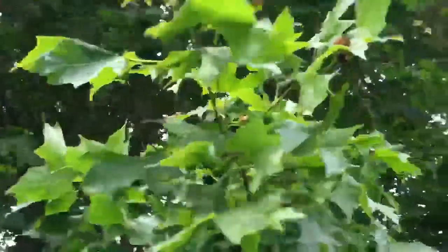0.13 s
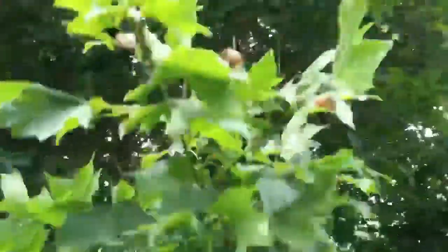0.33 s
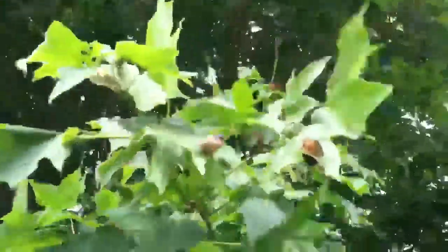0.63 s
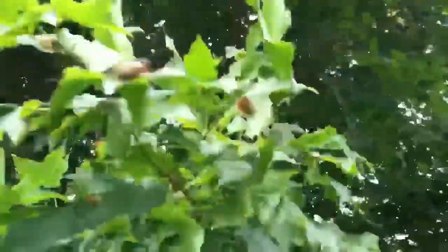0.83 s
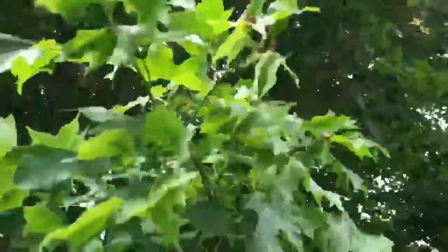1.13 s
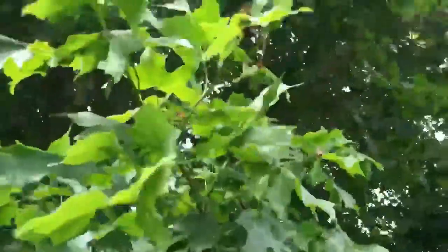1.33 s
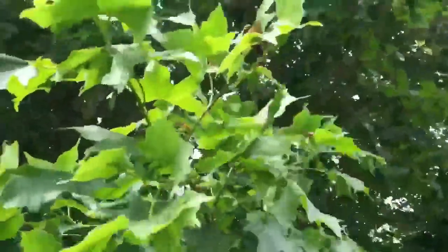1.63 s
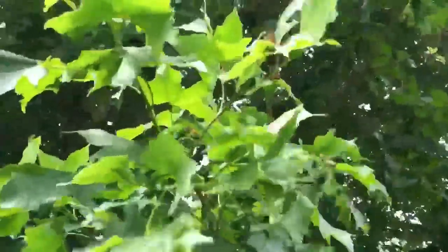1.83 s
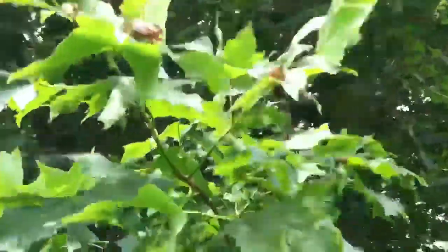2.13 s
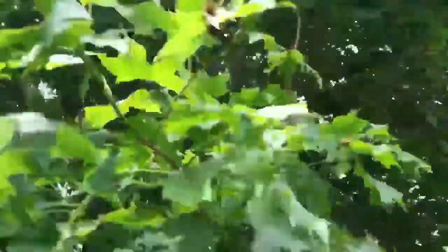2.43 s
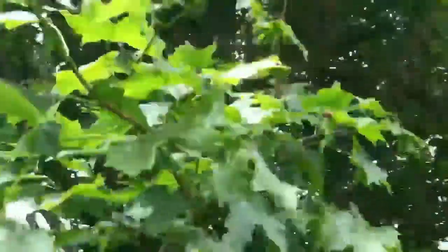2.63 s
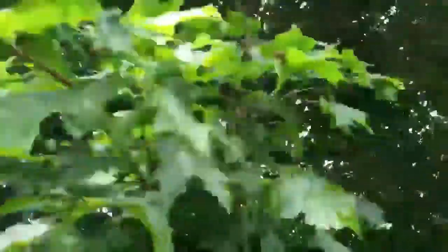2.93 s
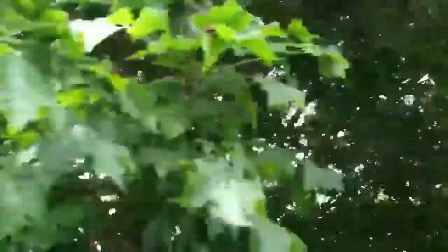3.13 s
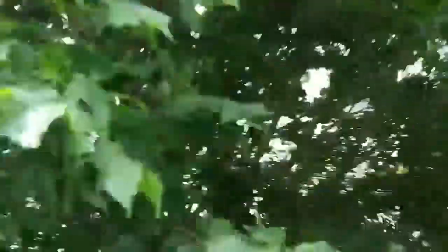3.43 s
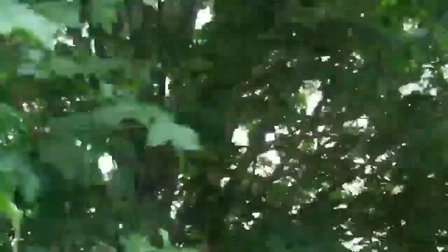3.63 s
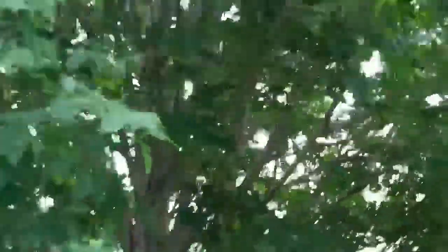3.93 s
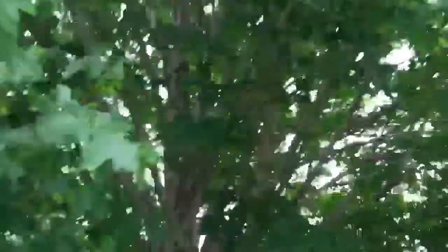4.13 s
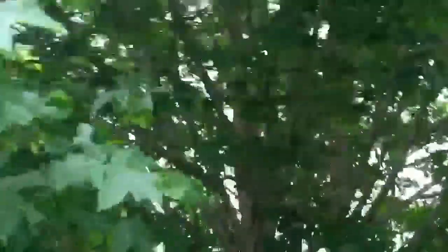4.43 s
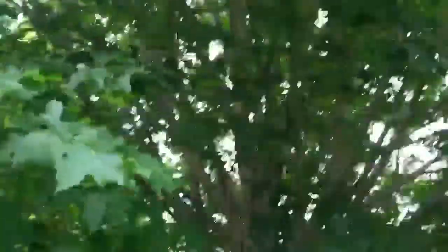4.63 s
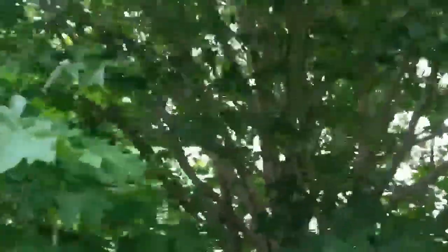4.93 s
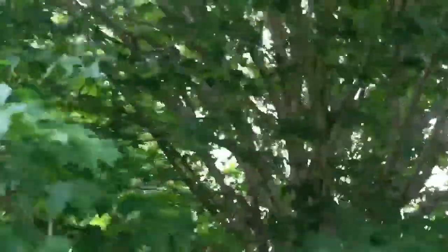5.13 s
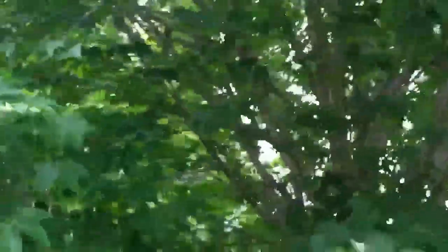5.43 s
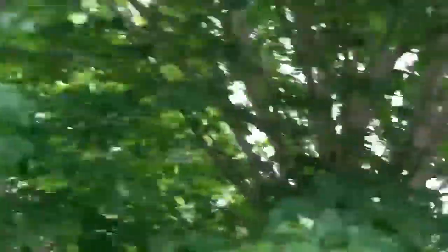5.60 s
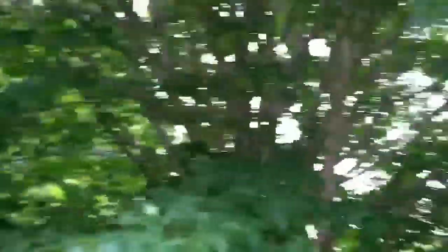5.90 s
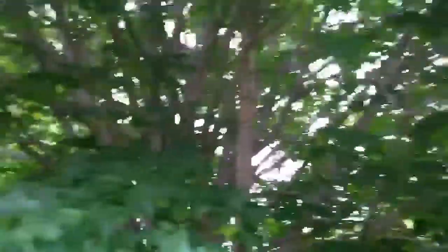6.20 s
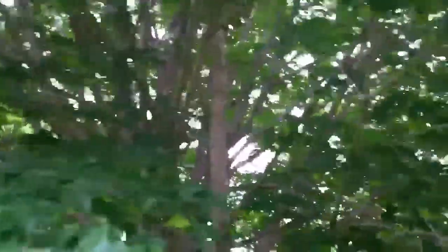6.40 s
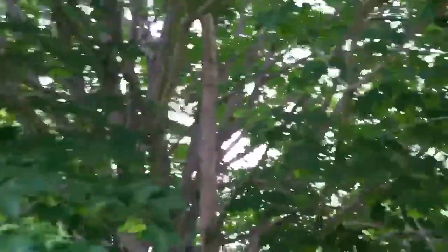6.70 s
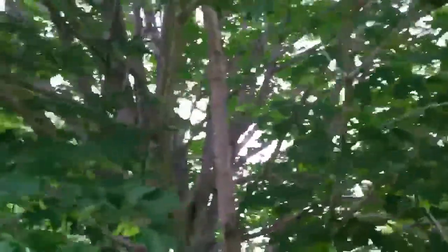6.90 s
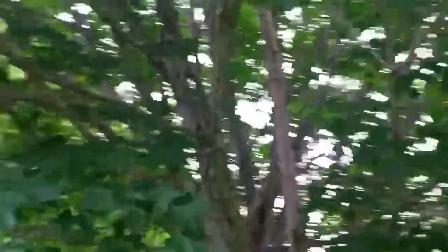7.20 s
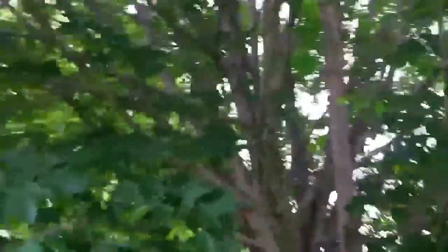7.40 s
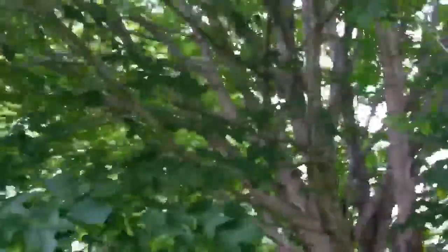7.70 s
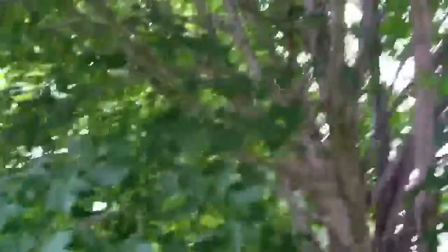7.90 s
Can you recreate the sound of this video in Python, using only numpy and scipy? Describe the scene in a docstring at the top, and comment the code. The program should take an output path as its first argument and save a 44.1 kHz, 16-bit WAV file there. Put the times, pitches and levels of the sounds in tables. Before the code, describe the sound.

Outdoors among trees, continuous shrill cicada song surges in slow waves, grainy and dense, never pausing. Breeze flutters and thuds against an unprotected microphone in the first half, strongest just before four seconds, and the second half is calmer. A distant motor hum and rough whirr become more noticeable later, over a soft wash of far road noise and a low insect drone. Left channel only, right silent.

```python
"""A swarm of periodical cicadas drones in the trees round a yard, swelling and sinking in waves.
Shaped noise is the far swarm; click trains ringing in body resonances are the near ones, crackling through it.
A second species, narrow-band noise, hums lower, far off; two distant machines and a fan add harmonics and tones.
A breeze, noise under gust and eddy envelopes, buffets the microphone, which feeds only the left channel."""
import sys
import numpy as np
from scipy import signal
from scipy.fft import rfft, irfft, next_fast_len
from scipy.io import wavfile
from scipy.ndimage import uniform_filter1d

SR = 44100
rng = np.random.default_rng(int(sys.argv[2]) if len(sys.argv) > 2 else 0)


def to_wav(sig):
    """Store sig (one row per channel, or 1-D mono) as 16-bit WAV at the path in sys.argv[1].

    Samples outside -1..1 are clipped; the rate is SR.
    """
    pcm = np.clip(np.atleast_2d(sig), -1, 1) * 32767
    pcm = np.round(pcm).astype(np.int16)
    wavfile.write(sys.argv[1], SR, pcm.T)  # frames by channels


N = 355049
TIME = np.arange(N) / SR
FREQ = np.fft.rfftfreq(N, 1 / SR)
# Source levels are set ahead of the input gain in scene().


def gain_of(db):
    """Decibels to amplitude."""
    return 10 ** (np.asarray(db) / 20)


def evened(x):
    """Scales to rms 1."""
    return x / np.sqrt(np.mean(x ** 2) + 1e-20)


def noise():
    """White noise."""
    return rng.standard_normal(N)


def wander(rate_hz):
    """Slow random drift of rms 1: straight lines between rate_hz random knots a second."""
    knots = rng.standard_normal(4096)
    return evened(np.interp(TIME * rate_hz, np.arange(len(knots)), knots))


def follow(rows):
    """Each column of a curve table, sample by sample."""
    t, *columns = np.transpose(rows)
    return [np.interp(TIME, t, column) for column in columns]


def bell(peak_s, length_s):
    """Gaussian envelope that peaks at peak_s and falls to 1/e in length_s."""
    return np.exp(-np.minimum(((TIME - peak_s) / length_s) ** 2, 60))


def waves(rows):
    """Height in dB of smooth swells that rise to a crest and sink back."""
    height_db = np.zeros(N)
    for crest_s, rise_s, fall_s, db in rows:
        side_s = np.where(TIME < crest_s, rise_s, fall_s)
        position = np.clip((TIME - crest_s) / side_s, -1, 1)
        height_db += db * np.cos(np.pi / 2 * position) ** 2
    return height_db


def filtered(x, gain):
    """Applies a gain given for every frequency in FREQ; rms 1."""
    size = next_fast_len(N, True)
    size_gain = np.interp(np.fft.rfftfreq(size, 1 / SR), FREQ, gain)
    return evened(irfft(rfft(x, size) * size_gain, size)[:N])


def coloured(x, points):
    """Weights the spectrum of x by (Hz, dB) points, joined on a log-frequency axis; rms 1."""
    hz, db = np.transpose(points)
    return filtered(x, gain_of(np.interp(np.log(FREQ + 1), np.log(hz + 1), db)))


def resonance(hz, width_hz):
    """Gain of a resonance of unit power, 6 dB down at width_hz / 2 either side."""
    return evened(1 / (1 + ((FREQ - hz) / width_hz * 2) ** 2))


def turning(hz, drift, rate_hz):
    """Phase in radians of a rotation at hz whose speed drifts by the fraction drift (rms)."""
    return 2 * np.pi * np.cumsum(hz * (1 + drift * wander(rate_hz))) / SR


def harmonics(phase, rows, waver_db, smear_rad, smear_rate_hz=7):
    """Harmonics of a turning machine; each fades and smears on its own way through the trees."""
    total = np.zeros(N)
    for multiple, db in rows:
        start = 2 * np.pi * rng.random()
        angle = round(multiple) * phase + smear_rad * wander(smear_rate_hz) + start
        total += gain_of(db + waver_db * wander(6)) * np.sin(angle)
    return evened(total)


def tymbals(count=12, click_rate_hz=330, jitter=.12, size_db=1.5, swell_db=1.7):
    """Near cicadas: each buckles its ribs in a fast uneven train that swells and fades."""
    clicks = np.zeros(N)
    for _ in range(count):
        rate_hz = click_rate_hz * rng.uniform(.7, 1.3) * (1 + jitter * wander(60))
        at = np.flatnonzero(np.diff(np.floor(np.cumsum(rate_hz) / SR)))
        swell = swell_db * wander(1.62)[at]
        size = size_db * np.clip(noise()[at], -2.5, 2.5)
        clicks[at] += gain_of(swell + size)
    return evened(clicks)


def callers(count=5, low_hz=4800, high_hz=6900, width_hz=3800):
    """Small groups of near cicadas, each with its own body pitch."""
    groups = [filtered(tymbals(count=2), resonance(hz, width_hz))
              for hz in np.linspace(low_hz, high_hz, count)]
    return evened(sum(groups))


# body colour of the massed tymbals: f/Hz, relative level/dB
BUZZ = [(1900, -40), (2700, -32.5), (3200, -22.5), (3700, -12), (4200, -7.5), (5150, -7), (5550, -2),
        (6050, -0.5), (6550, -3.5), (7450, -13), (8400, -14.5), (10000, -24.4), (12400, -33), (13300, -69)]
# waves of song: crest t/s, rise/s, fall/s, height above lull/dB
WAVES = [(3.0, 2.7, 1.4, 4), (4.15, 1.1, 1.37, 3.5), (7.9, 2.23, 1.95, 3.5)]


def chorus(lull_db=-26, near_db=-9, flutter_db=0.4, shrill_hz=6400, shrill_db_per_db=0.15):
    """Near clicks and the blur of the far swarm ring in the same body; louder waves are shriller."""
    wave_db = waves(WAVES)
    song = coloured(noise() + gain_of(near_db) * callers(), BUZZ)
    high_pass = signal.butter(3, shrill_hz, "high", fs=SR, output="sos")
    treble = signal.sosfiltfilt(high_pass, song)
    shrill_db = shrill_db_per_db * (wave_db - wave_db.mean())
    song = song + treble * (gain_of(shrill_db) - 1)
    return evened(song) * gain_of(lull_db + wave_db + flutter_db * wander(25))


# low-voiced species: t/s, level/dB
DRONE = [(0, -63.5), (2, -61), (5.2, -60.5), (8.05, -62)]


def low_chorus(hz=1125, width_hz=110, waver_db=1.0):
    """Far cicadas of the second species: many near-pure notes blur into one hollow drone."""
    level_db, = follow(DRONE)
    return filtered(noise(), resonance(hz, width_hz)) * gain_of(level_db + waver_db * wander(2.6))


# engine speed: t/s, firing rate f/Hz
FIRING = [(0, 111.7), (4.5, 111), (5.7, 109), (6.6, 111), (7.6, 110.5), (8.05, 113)]
# exhaust as it comes into the open: t/s, level/dB
ENGINE = [(0, -64.5), (2.8, -61), (4.6, -53), (5.2, -56), (6.0, -58.5), (6.5, -48.5), (7.4, -54),
          (8.05, -50.5)]
# exhaust harmonics: multiple of firing rate, relative level/dB
EXHAUST = [(1, 0.5), (3, -2), (5, -12.5), (7, -21), (13, -18)]
# boom, second harmonic: t/s, level/dB
BOOM = [(0, -49), (5.2, -62.5), (6.2, -56), (8.05, -52)]
# blare, fourth harmonic: t/s, level/dB
BLARE = [(0, -74), (5.6, -75), (6.3, -61.5), (8.05, -67.5)]


def engine(drift=0.00196, waver_db=2.3, smear_rad=0.44):
    """Exhaust harmonics of a distant engine; the second and fourth come and go by themselves."""
    firing_hz, = follow(FIRING)
    phase = turning(firing_hz, drift, 6)
    total = np.zeros(N)
    for curve, rows in [(ENGINE, EXHAUST), (BOOM, [(2, 0)]), (BLARE, [(4, 0)])]:
        level_db, = follow(curve)
        total += gain_of(level_db) * harmonics(phase, rows, waver_db, smear_rad)
    return total


# steady fan and motor tones: f/Hz, level/dB
FAN = [(77.5, -85), (129.3, -57.5), (155.3, -58), (207, -63.5), (390, -77.5), (649, -72), (768, -75),
       (1730, -74)]


def fan(drift=0.002916):
    """Faint tones of a fan and its motor, each wavering slightly in pitch."""
    return sum(gain_of(db) * evened(np.sin(turning(hz, drift, 8))) for hz, db in FAN)


# outdoor background colour: f/Hz, relative level/dB
AIR = [(20, -45), (45, -42), (70, -10), (110, -4), (170, -6), (280, -7.5), (450, -10.5), (850, -13.5),
       (1350, -13.5), (2000, -20), (4000, -16), (13000, -49)]


def background_air(level_db=-55):
    """Steady outdoor background: coloured noise."""
    return gain_of(level_db) * coloured(noise(), AIR)


def swirl(points, size=400):
    """Churning air of a given colour and of even strength."""
    air = coloured(noise(), points)
    power = uniform_filter1d(uniform_filter1d(air ** 2, size), size)
    return air / np.sqrt(power + 1e-6)


# gusts: peak t/s, half-length/s, level/dB
GUSTS = [(.8, 0.33, -68), (1.545, 0.11, -52), (1.862, 0.16, -44), (2.39, 0.22, -52), (2.707, 0.21, -53),
         (3.167, 0.2, -44.5), (3.677, 0.11, -43), (3.927, 0.15, -61), (4.45, 0.36, -62)]
# eddies churning on the microphone: peak t/s, level/dB, half-length/s, fine whirls re eddy/dB
EDDIES = [(0.614, -46, 0.0092, -8), (0.66, -59, .01, -25), (0.848, -41, 0.015, -25),
          (1.164, -39.5, 0.016, -27), (1.193, -45, 0.01, -1), (1.22, -47, 0.011, -8),
          (1.596, -40, 0.0075, -31), (1.684, -41, 0.013, -21), (1.74, -40.5, 0.019, -10),
          (1.797, -36, 0.005, -9), (1.828, -32, 0.011, -8), (1.88, -42, .007, -5),
          (1.899, -33, 0.0086, -15), (1.968, -37.5, 0.021, -9.5), (2.066, -36.5, 0.0073, -28),
          (2.265, -41.5, 0.004, -12), (2.31, -48, 0.011, -17), (2.39, -40, 0.016, -9),
          (2.416, -45, .009, -19.5), (2.452, -38, 0.0057, -6), (2.671, -41.5, 0.013, -17),
          (2.703, -39, 0.01, -10), (2.878, -42, 0.014, -13), (2.996, -38, 0.018, -6),
          (3.036, -32, 0.01, -8.5), (3.069, -39, 0.008, -6), (3.13, -33.5, 0.0062, -11),
          (3.171, -34, 0.011, -9), (3.295, -38.5, 0.019, -13), (3.55, -40, .008, -19),
          (3.585, -32.5, 0.011, -11.5), (3.606, -35, 0.0089, -11), (3.637, -36, 0.012, 2),
          (3.66, -35, 0.013, 1), (3.687, -30, 0.016, -3), (3.706, -30.5, 0.014, -4),
          (3.729, -28, .006, -5.5), (3.75, -38, 0.009, -26), (3.863, -43, 0.019, -1),
          (3.904, -40.5, 0.019, -7), (4.002, -38.5, 0.014, -4.5), (4.06, -43, 0.029, -14),
          (4.31, -36, 0.014, -25), (4.348, -43, 0.014, -11), (4.386, -37, .009, -14),
          (4.551, -44, 0.012, -21), (4.704, -44, 0.016, -20), (6.103, -45.5, 0.024, -16)]
# colour of large whirls: f/Hz, relative level/dB
BUFFET = [(20, -52), (60, -40), (90, -18), (125, -3.5), (180, 4), (240, -1.5), (300, -10.5), (360, -15),
          (500, -54), (750, -52), (2500, -85)]
# colour of fine whirls: f/Hz, relative level/dB
RUFFLE = [(100, -28), (250, 4.5), (400, 2.5), (600, -13.5), (800, -28), (1100, -36), (2500, -65)]


def wind(calm_db=-59, lump_db=3.0, ruffle_db=-16, strong_db=-30,
         deep_db=-47, deep_growth=0.81, deep_hz=110, deep_width_hz=50,
         spray_db=-49, spray_growth=2.7, spray_hz=700, spray_width_hz=380, cut_hz=70):
    """Lumpy gusts at the microphone port: thumping eddies, deep rumble, fine ruffle; the hardest hiss."""
    breeze = gain_of(calm_db) + sum(gain_of(db) * bell(s, length_s) for s, length_s, db in GUSTS)
    breeze = breeze * gain_of(lump_db * wander(30))
    large, fine = breeze, gain_of(ruffle_db) * breeze
    for s, db, length_s, fine_db in EDDIES:
        eddy = gain_of(db) * bell(s, length_s)
        large = np.hypot(large, eddy)
        fine = np.hypot(fine, eddy * gain_of(fine_db))
    # deep_db and spray_db hold where the envelope equals strong_db
    deep_gain = gain_of(deep_db) * (large / gain_of(strong_db)) ** deep_growth
    deep = deep_gain * filtered(noise(), resonance(deep_hz, deep_width_hz))
    spray_gain = gain_of(spray_db) * (fine / gain_of(strong_db)) ** spray_growth
    spray = spray_gain * filtered(noise(), resonance(spray_hz, spray_width_hz))
    air = large * swirl(BUFFET) + fine * swirl(RUFFLE) + deep + spray
    return signal.sosfilt(signal.butter(3, cut_hz, "high", fs=SR, output="sos"), air)


# swells of the whirr: crest t/s, rise/s, fall/s, height above quiet level/dB
WHIRR = [(4.6, 0.96, 1.3, 6.5), (7.6, 1.5, 4.5, 16)]
# blade tones: multiple of turning rate, relative level/dB
BLADE = [(6, -3.5), (7, -9), (8, 0.5), (9, 3.5), (10, 1.5), (11, -21), (12, -3), (22, -3), (24, -12)]
# rush of air round it: f/Hz, width/Hz, relative level/dB
HOUSING = [(640, 830, -0.5), (1370, 720, -16)]


def whirr(turn_hz=66.1, blade_db=-69.5, rush_db=-70, drift=0.005, waver_db=3, smear_rad=1.26):
    """A second far machine: rough blade tones in a rush of air; both levels hold between swells."""
    blades = harmonics(turning(turn_hz, drift, 3), BLADE, waver_db, smear_rad)
    housing = sum(gain_of(db) * resonance(hz, width_hz) for hz, width_hz, db in HOUSING)
    rush = filtered(noise(), housing)
    return gain_of(waves(WHIRR)) * (gain_of(blade_db) * blades + gain_of(rush_db) * rush)


# single cicadas out of the chorus: peak t/s, rise/s, fall/s, f/Hz, width/Hz, level/dB
SOLOS = [(.1, .15, 0.11, 6000, 1200, -38), (.95, 0.04, 0.034, 6100, 868, -29.5),
         (2.46, .06, .08, 8300, 500, -44), (3.95, 0.52, 0.4, 9350, 1900, -45.5),
         (4.33, 0.92, 0.13, 6540, 890, -29), (4.6, 0.14, 0.24, 9700, 1200, -51),
         (5.0, 0.24, .07, 6160, 1100, -36.5), (4.98, 0.16, 0.11, 8530, 380, -44.5),
         (5.05, 0.13, 0.065, 8200, 80, -45), (7.27, 0.19, 0.18, 6160, 1260, -29.5),
         (8.03, 0.088, .1, 6300, 1100, -27)]


def solos():
    """Single buzzes, clicks blurred by the leaves, that build up and break off."""
    drive, out = tymbals(count=1) + noise(), np.zeros(N)
    for s, rise_s, fall_s, hz, width_hz, db in SOLOS:
        envelope = bell(s, np.where(TIME < s, rise_s, fall_s))
        out += gain_of(db) * envelope * filtered(drive, resonance(hz, width_hz))
    return out


# hardest eddies: t/s, peak level/dB, half-length/ms
BLOWS = [(.607, -40, 1.1), (.85, -36, 1.7), (1.189, -30, 0.98), (1.845, -22.5, 0.83), (1.887, -32, 0.55),
         (1.91, -20.5, 1.26), (1.943, -27, 0.84), (2.473, -28, 0.94), (2.483, -27, 1.04),
         (3.038, -25, 0.88), (3.082, -29, 1.1), (3.165, -33, .85), (3.212, -23.5, 0.92), (3.451, -28, 1.1),
         (3.651, -24, 0.71), (3.66, -19.5, 0.72), (3.68, -26, .7), (3.695, -22.5, .58), (3.714, -24, 0.88),
         (3.853, -29, 1.25), (4.309, -32, 1.9), (4.389, -35, 0.97), (4.441, -32.5, 0.82), (4.469, -32, 1.1),
         (4.755, -35, 1.4), (6.082, -34, 1.3)]


def blows(port_hz=125, count=2000):
    """Each blow is one push of pressure, in or out, that swings briefly in the microphone's low cut."""
    lead = count // 4
    ms, out = (np.arange(count) - lead) * 1000 / SR, np.zeros(N)
    port = signal.butter(4, port_hz, "high", fs=SR, output="sos")
    for s, db, length_ms in BLOWS:
        push = signal.sosfilt(port, np.exp(-np.minimum((ms / length_ms) ** 2, 60)))
        start = round(s * SR) - lead
        out[start:start + count] += rng.choice([-1, 1]) * gain_of(db) * push / abs(push).max()
    return out


# far road noise, growing as the microphone turns, then sinking: t/s, level/dB
ROAD = [(1.9, -86), (5.1, -59.5), (8.05, -66.5)]


def road(hz=1500, width_hz=1500):
    """A soft, even wash of distant tyres."""
    level_db, = follow(ROAD)
    return gain_of(level_db) * filtered(noise(), resonance(hz, width_hz))


def scene(input_gain_db=6):
    """Everything reaches one microphone, on the left; the right channel is silent."""
    cicadas = chorus() + low_chorus() + solos()
    background = engine() + fan() + background_air() + whirr() + road()
    left = gain_of(input_gain_db) * (cicadas + background + wind() + blows())
    return np.array([left, np.zeros(N)])


def record(dry, edge_hz=12950):
    """The recorder's band limit: a linear-phase low-pass."""
    low_pass = signal.firwin(511, edge_hz, window=("kaiser", 9), fs=SR)
    return signal.oaconvolve(dry, low_pass[None], "same", axes=1)


dry = scene()
out = record(dry)
to_wav(out)
```